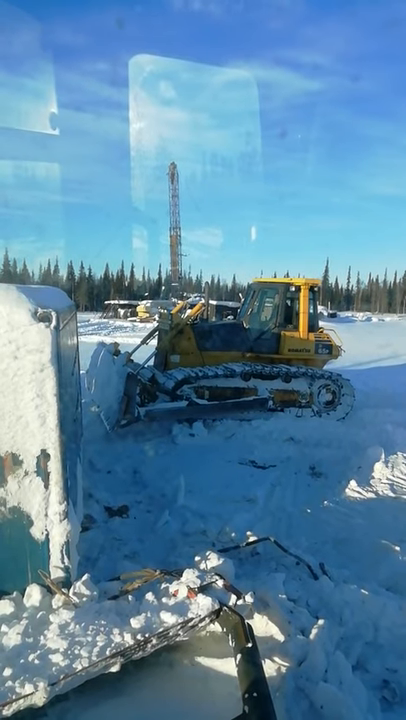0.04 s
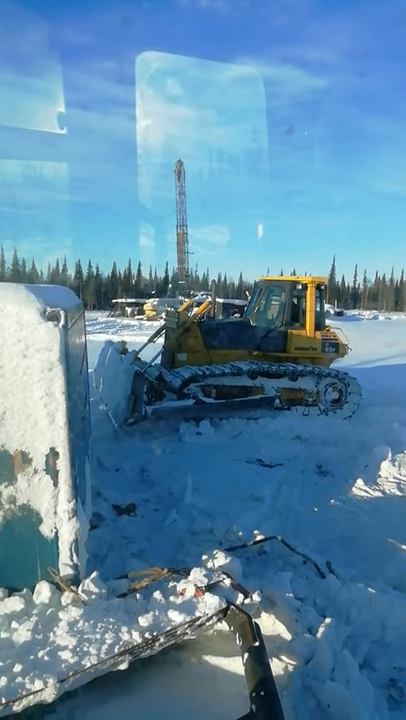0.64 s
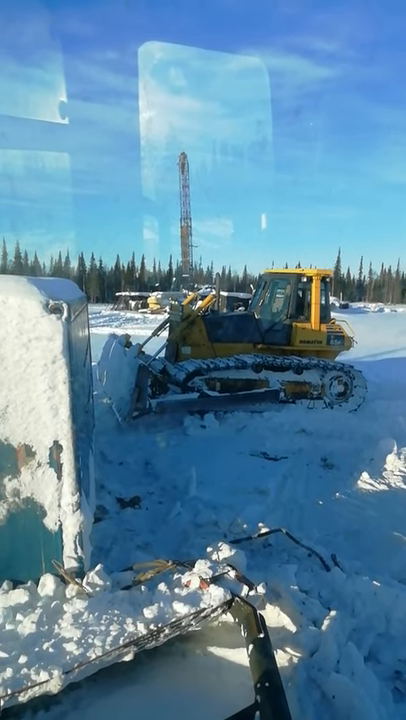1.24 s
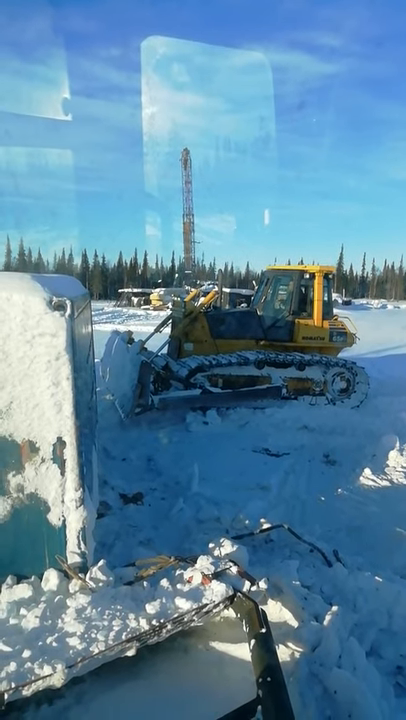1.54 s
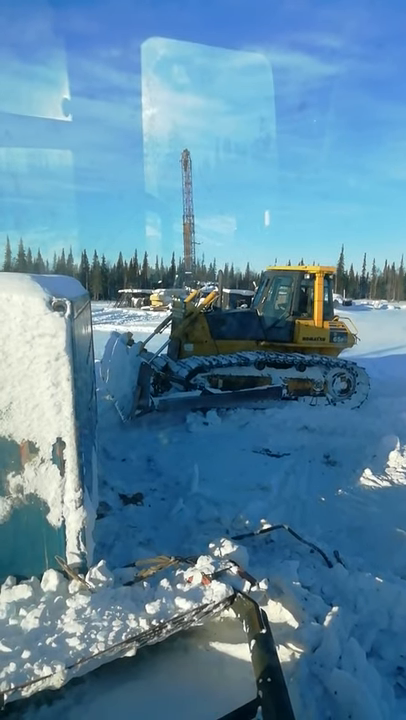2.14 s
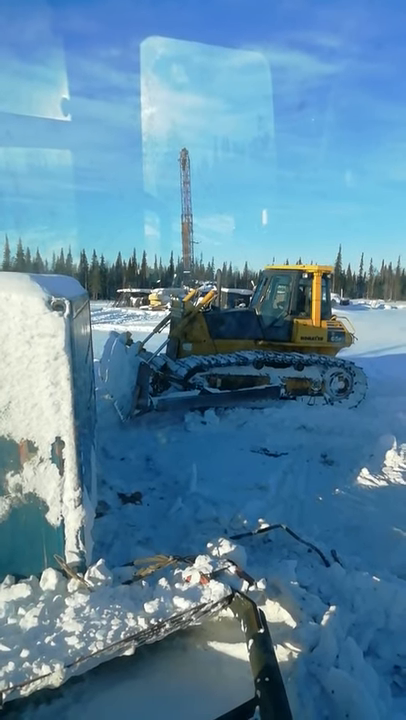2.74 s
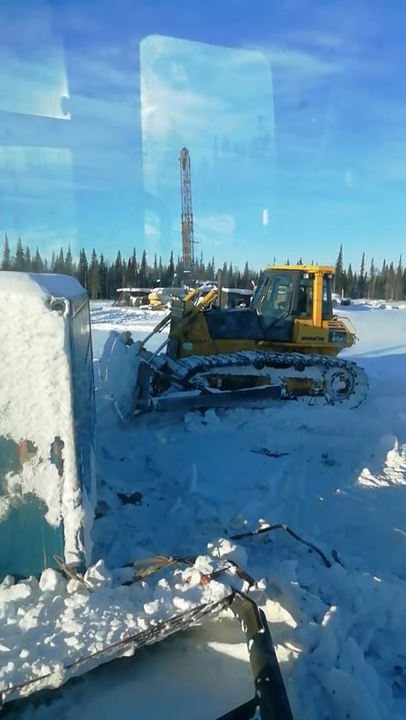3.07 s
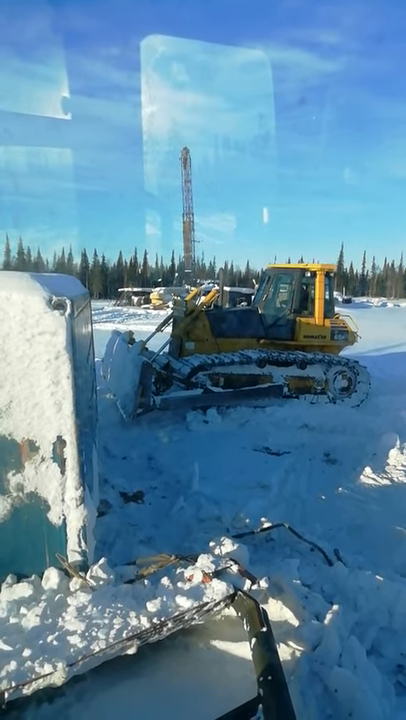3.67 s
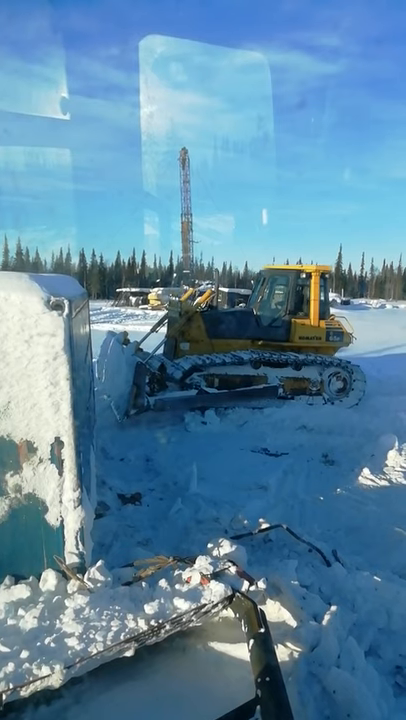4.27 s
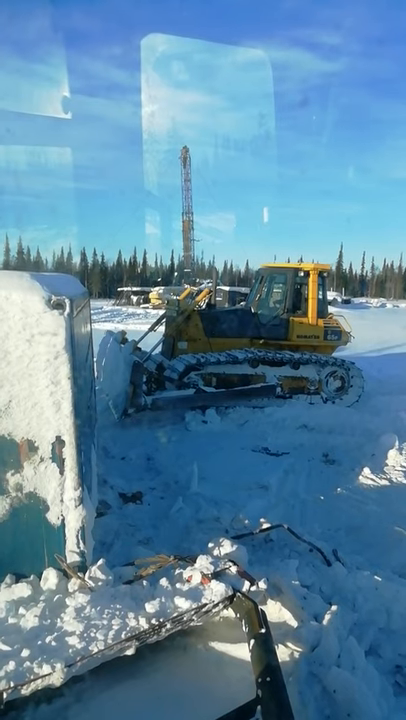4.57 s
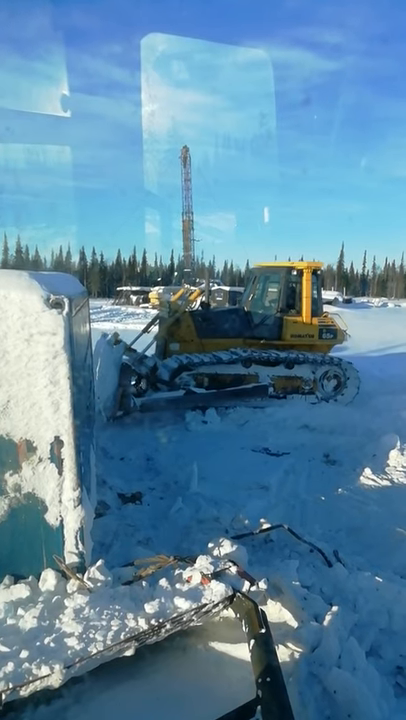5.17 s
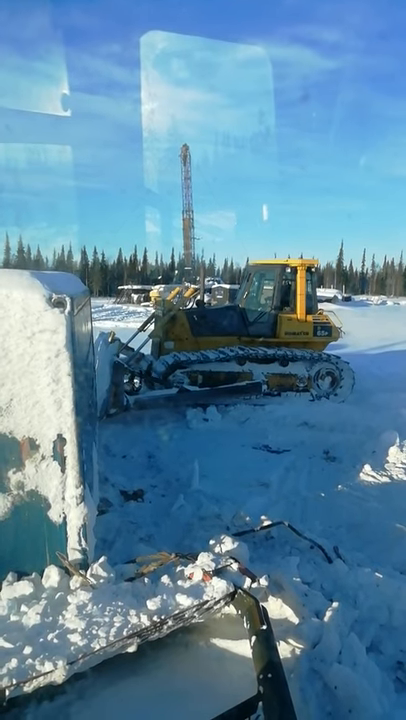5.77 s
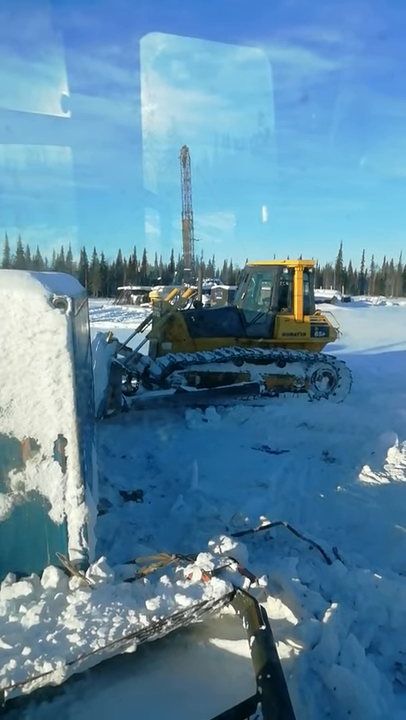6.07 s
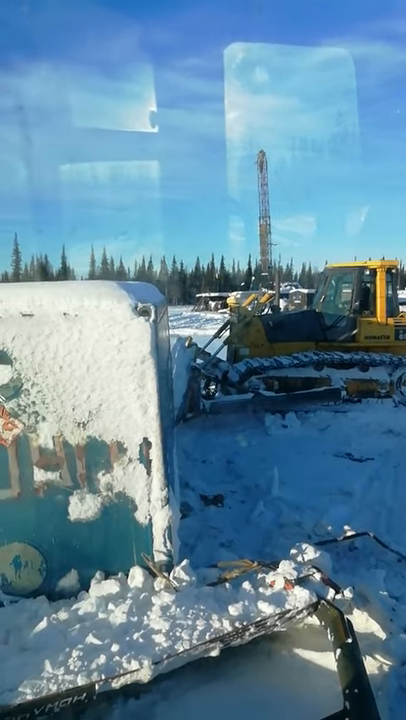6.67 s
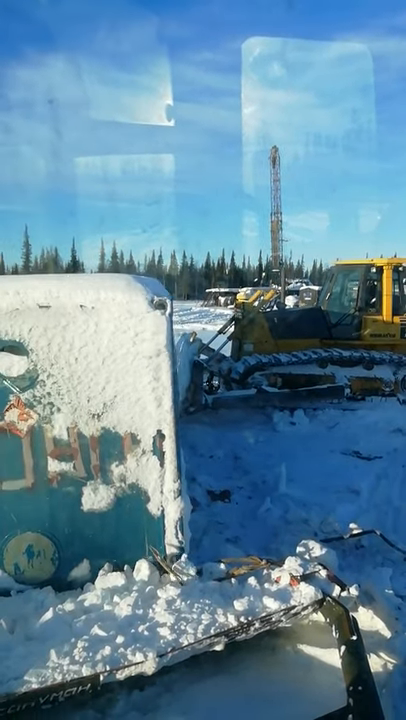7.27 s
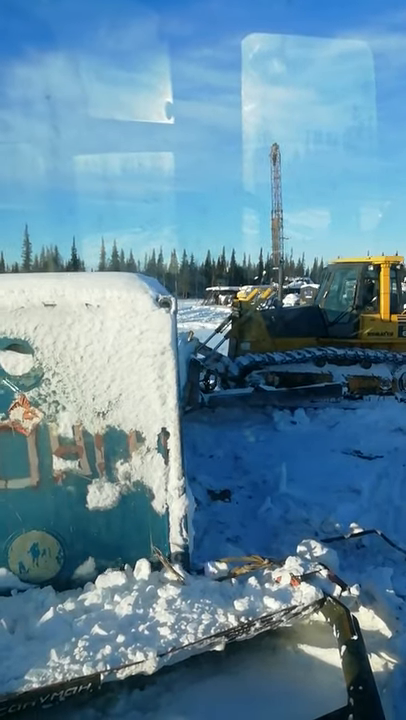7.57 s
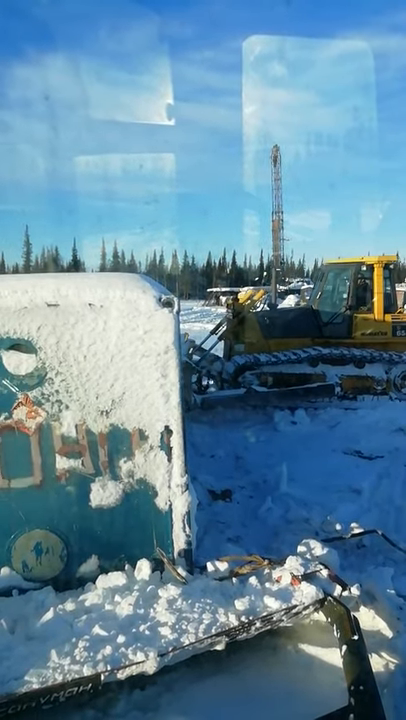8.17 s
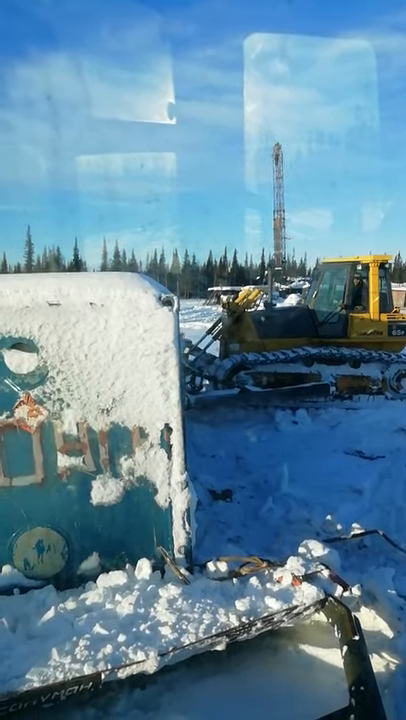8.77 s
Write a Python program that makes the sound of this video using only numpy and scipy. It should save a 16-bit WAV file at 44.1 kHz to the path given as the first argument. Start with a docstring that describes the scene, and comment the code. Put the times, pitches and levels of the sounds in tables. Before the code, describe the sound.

A diesel engine idles steadily with a deep booming hum, fan drone and gear whine, heard from inside a crawler's cab.

```python
"""A six-cylinder diesel idles steadily, heard from inside the cab of a crawler machine standing in snow.
From the start its firing booms over combustion rumble, block noise, clatter and injector ticks; the fan
drones, a gear whines, pulleys sing faintly and a second engine outside beats against the hum.
At 6.3 s the microphone turns through the cab's standing waves: the whine swells and moves right,
thin metal rings and the ticks come forward. The idle runs on in this new colour to the end."""
import sys
import numpy as np
from scipy.fft import rfft, irfft, next_fast_len
from scipy.io import wavfile
from scipy.ndimage import map_coordinates

SR = 44100
rng = np.random.default_rng(int(sys.argv[2]) if len(sys.argv) > 2 else 0)


def generate_wav(signal):
    """Clip the signal to [-1, 1] and save it as 16-bit WAV at the path in sys.argv[1]."""
    frames = np.transpose(np.atleast_2d(signal))
    scaled = np.clip(frames, -1, 1) * 32767
    pcm = np.round(scaled).astype(np.int16)
    wavfile.write(sys.argv[1], SR, pcm)


N = 393372
T = np.arange(N) / SR
FIRING_HZ, FIRING_START = 41.137, .4335  # idle rate; share of a firing interval gone at the start
TURN_START_S, TURN_S = 6.3, 0.59  # the microphone's one turn


def amp(db):
    """Decibels to gain."""
    return 10 ** (np.asarray(db) / 20)


def along(table, hz):
    """Each column of a spectrum table at hz, on a log frequency axis."""
    freq_hz, *columns = np.transpose(table)
    return np.array([np.interp(np.log(hz + 1), np.log(freq_hz + 1), column) for column in columns])


def wobble(rate):
    """A smooth random curve, rate knots a second."""
    return map_coordinates(rng.standard_normal(int(N * rate / SR) + 4), [T * rate], mode="nearest")


def swing(period_s, crest_s):
    """A slow, even swing between -1 and 1."""
    return np.cos(2 * np.pi * (T - crest_s) / period_s)


def filtered(x, response):
    """x through a frequency response, its ends mirrored smoothly."""
    x = np.pad(x, ((0, 0), (SR, SR)), mode="reflect", reflect_type="odd")
    size = next_fast_len(x.shape[1])
    return irfft(rfft(x, size) * response(np.fft.rfftfreq(size, 1 / SR)), size)[:, SR:SR + N]


def coloured(white, spectrum):
    """White noise of rms 1 shaped to a spectrum in dB per Hz."""
    gain = amp(along(spectrum, np.fft.rfftfreq(N, 1 / SR)))
    return irfft(rfft(white) * gain, N) * np.sqrt(SR / 2)


def tone(cycles, left_db, right_db, lead_rad, waver_db, drift_rad):
    """A wavering tone that standing waves bring to each side with its own level and phase."""
    angle = 2 * np.pi * (cycles + rng.random()) + drift_rad * wobble(5)
    left = amp(left_db) * np.cos(angle + lead_rad / 2)
    right = amp(right_db) * np.cos(angle - lead_rad / 2)
    return np.sqrt(2) * amp(waver_db * wobble(2.4)) * np.array([left, right])


# Accent of each cylinder's knock, in firing order: level_db
CYLINDER_ACCENTS = [-1, -0.16, -0.17, 0.92, 0.89, 0.31]
def bursts(firing, delay, decay, steady, scatter_db):
    """Envelope of rms 1: one burst per firing over a steady bed; delay and decay in firing intervals."""
    stroke, age = np.divmod(firing - delay + len(CYLINDER_ACCENTS), 1)
    stroke = stroke.astype(int)
    scatter = scatter_db * rng.standard_normal(stroke.max() + 1)[stroke]
    accent = amp(np.take(CYLINDER_ACCENTS, stroke, mode="wrap") + scatter)
    envelope = np.hypot(steady, accent * age / decay * np.exp(1 - age / decay))
    return envelope / np.sqrt(np.mean(envelope ** 2))


# How much later the engine reaches the left side: freq_hz, lag_s
LEFT_LAG = [(40, .00024), (100, .00017), (200, .00004), (350, 0.00057), (520, 0.00096), (1000, 0.00071),
            (3000, .0006)]
def lagged(x):
    """Sound reaches the right side just ahead of the left."""
    return filtered(np.atleast_2d(x),
                    lambda hz: np.exp(1j * np.pi * hz * along(LEFT_LAG, hz) * [[-1], [1]]))


# Change of colour once the microphone has turned: freq_hz, gain_db
TURNED_EQ = [(500, -0.5), (780, 1), (1250, -.5), (1700, -3.5), (2250, 1), (2750, 0), (3400, -0.5),
             (4200, -1), (5800, -1.5), (7500, -0.5)]
def cab(x, turn, ripple_db=2.0, spacing_hz=55):
    """Glass and steel walls ripple the treble differently on each side; the turn shifts the colour."""
    def ripple(hz):
        knots = rng.standard_normal((2, N // 100))
        field = np.array([map_coordinates(side, [hz / spacing_hz], mode="nearest") for side in knots])
        return amp(ripple_db * field * hz / (hz + 1500))
    x = filtered(x, ripple)
    turned = filtered(x, lambda hz: amp(along(TURNED_EQ, hz)))
    return (1 - turn) * x + turn * turned


def second_engine(firing_hz=74.9):
    """The firing hum of a diesel outside, beating against the octave of the near one."""
    level_db = -32.5 + 0.91 * wobble(2.2)
    return np.sqrt(2) * amp(level_db) * np.cos(2 * np.pi * firing_hz * T + 0.051 * wobble(8.2))


# Faint tones of belt-driven parts: pitch_hz, left_db, right_db
PULLEY_TONES = [(236.7, -51, -56.5), (301.7, -58.5, -58.5), (401.5, -58, -55), (815, -54.5, -66.5),
                (812, -56.5, -63.5), (915, -57.5, -66), (969, -60.5, -55.5), (1038, -64.5, -63),
                (1153.5, -62.5, -62)]
def pulleys(firing):
    """Pulleys sing faintly, following the engine's speed."""
    engine_s = firing / FIRING_HZ
    return sum(tone(pitch_hz * engine_s, left_db, right_db, lead_rad=0.75, waver_db=0.9, drift_rad=0.33)
               for pitch_hz, left_db, right_db in PULLEY_TONES)


# Injector sizzle before its lift: freq_hz, left_db_per_hz, right_db_per_hz
TICK_SPECTRUM = [(3000, -125, -125), (8900, -120, -122), (12300, -108, -116), (14200, -106, -116),
                 (14750, -98, -111), (15200, -104, -118), (15700, -111, -130)]
def injectors(firing, turn):
    """A fine tick between ignitions over a thin hiss, clearer once the microphone has turned."""
    ticks = bursts(firing, delay=0.56, decay=.05, steady=0.3, scatter_db=1.4)
    lift_db = 1.5 + 3.4 * turn
    return coloured(rng.standard_normal((2, N)) * ticks, TICK_SPECTRUM) * amp(lift_db)


# Combustion rasp, then thin metal ring: freq_hz, left_db_per_hz, right_db_per_hz
RASP_SPECTRUM = [(900, -100, -100), (2200, -89.5, -92), (3350, -91.5, -90.5), (4280, -99.5, -98),
                 (4930, -94, -95), (5750, -100, -97.5), (6960, -106, -96), (8030, -111, -100),
                 (8900, -109, -108), (9900, -105, -106), (11200, -108, -111), (15500, -110, -114)]
RING_SPECTRUM = [(2800, -120, -120), (3480, -90.5, -90), (4230, -115, -115), (4800, -92, -94),
                 (5050, -97.5, -92), (5600, -120, -120)]
def clatter(firing, turn):
    """Each ignition gives a short rasp and sets thin metal ringing; the ring fades in with the turn."""
    knocks = bursts(firing, delay=-.12, decay=.14, steady=0.97, scatter_db=1.8)
    ringing = bursts(firing, delay=-.12, decay=.14, steady=0.37, scatter_db=2.0)
    rasp = coloured(rng.standard_normal((2, N)) * knocks, RASP_SPECTRUM)
    ring = coloured(rng.standard_normal((2, N)) * ringing, RING_SPECTRUM)
    return rasp + turn * ring


# Placement of the whine before and after the turn: left_db, right_db, left_lead_rad
WHINE_PLACEMENT = [(-42.5, -44.5, -1.1), (-57, -40, -.1)]
def timing_gear(firing, turn, teeth=62):
    """Meshing teeth whine; the whine sways between the sides, then swells and moves right with the turn."""
    mesh = firing * teeth / 3  # three firings a revolution
    before, after = WHINE_PLACEMENT
    left_db, right_db, lead_rad = np.outer(before, 1 - turn) + np.outer(after, turn)
    sway_db = swing(period_s=2.0, crest_s=0) * (1 - turn)
    whine = tone(mesh, left_db + sway_db, right_db - sway_db, lead_rad, waver_db=0.4, drift_rad=0.06)
    # the turn ends on a crest of the whine's standing wave
    crest_db = 2.5 * np.exp(-((T - TURN_START_S - TURN_S) / .2) ** 2)
    return amp(crest_db) * whine


# Fan drone: blade_harmonic, left_db, right_db, left_lead_rad, turned_gain_db
FAN_TONES = [(1, -30.5, -29.5, 0.11, 0), (2, -32.5, -32, 1.28, -1.2), (3, -53, -55.5, 2.74, -2.5),
             (4, -43.5, -45.5, 3, 0), (8, -67.5, -57, 2.2, -1.5), (10, -65, -73.5, 3.5, -3),
             (12, -77.5, -70, 2.5, -2.5), (14, -73.5, -68, 2.5, -3.5), (16, -64, -64.5, 1.1, -5.5),
             (20, -71, -68, 2.3, -5), (21, -78.5, -78, 2.3, -2), (22, -79, -80, 5.5, -2.5),
             (24, -84.5, -80, 2.5, -1)]
def fan(firing, turn, blades_per_firing=4.68025):
    """Blade tones, each with its own standing wave: the lowest beats slowly, the high ones waver more."""
    drone = np.zeros((2, N))
    beat_db = 2 * swing(period_s=1.899, crest_s=1.378)
    for harmonic, left_db, right_db, lead_rad, turned_gain_db in FAN_TONES:
        height = harmonic / len(FAN_TONES)
        partial = tone(harmonic * blades_per_firing * firing, left_db, right_db, lead_rad,
                       waver_db=0.36 + .6 * height, drift_rad=0.3 * height)
        drone += partial * amp(turned_gain_db * turn + beat_db * (harmonic == 1))
    return drone


# Engine noise through the cab walls: freq_hz, left_db_per_hz, right_db_per_hz
BLOCK_SPECTRUM = [(199, -86.5, -89), (356, -60.5, -64), (480, -67.5, -71.5), (670, -66, -68.5),
                  (797, -63, -65.5), (1068, -74.5, -76), (1154, -69.5, -67), (1416, -75, -71.5),
                  (1990, -81, -81), (2170, -79.5, -84), (2310, -86, -86), (3240, -91, -93),
                  (4200, -101, -101), (9000, -125, -125)]
# How much of it loops with the engine cycle: freq_hz, power_share
LOOP_SHARE = [(200, 0.56), (900, .5), (1500, 0.23), (3000, 0.061)]
# How alike its two sides are: freq_hz, coherence
STEREO_LIKENESS = [(250, 0.53), (560, 0.83), (1200, 0.44), (1900, 0.44), (3100, 0.34), (5000, .1)]
def engine_block(firing):
    """Noise of the block: part repeats with every engine cycle, part is new; it swells at each firing."""
    cylinders = len(CYLINDER_ACCENTS)
    cycle_samples = round(cylinders * N / (firing[-1] - firing[0]))
    position = firing / cylinders % 1 * cycle_samples
    looped = np.array([map_coordinates(cycle, [position], mode="grid-wrap")
                       for cycle in rng.standard_normal((2, cycle_samples))])
    fresh = rng.standard_normal((2, N))
    hz = np.fft.rfftfreq(N, 1 / SR)
    share = np.clip(along(LOOP_SHARE, hz), 0, 1)
    mid, side = np.sqrt(share) * rfft(looped) + np.sqrt(1 - share) * rfft(fresh)
    width_rad = np.arccos(np.clip(along(STEREO_LIKENESS, hz)[0], -1, 1)) / 2
    mid, side = mid * np.cos(width_rad), side * np.sin(width_rad)
    stereo = irfft(np.array([mid + side, mid - side]), N)
    swell = bursts(firing, delay=-0.13, decay=0.18, steady=1.2, scatter_db=2.0)
    flutter_db = 0.37 * wobble(3) + 0.57 * wobble(12)
    return coloured(stereo * swell, BLOCK_SPECTRUM) * amp(flutter_db)


# Low bed of combustion rumble: freq_hz, level_db_per_hz
RUMBLE_SPECTRUM = [(8, -68.5), (22, -53.5), (30, -58.5), (50, -52.5), (90, -49.5), (125, -56.5),
                   (150, -61.5), (200, -58.5), (240, -61), (285, -70.5), (375, -66.5), (440, -80),
                   (600, -95), (1200, -130)]
def rumble():
    """Low turbulence of exhaust and panels, in mono."""
    return coloured(rng.standard_normal((1, N)), RUMBLE_SPECTRUM)


# Cab boom, as harmonics of the two-revolution engine cycle: harmonic, level_db
BOOM_HARMONICS = [(3, -45.5), (5, -45), (6, -14.5), (7, -42), (8, -39.5), (10, -40.5), (12, -25.5),
                  (14, -45), (16, -36), (18, -30), (22, -46), (24, -44.5), (25, -41.5), (26, -40),
                  (30, -47.5), (32, -47), (34, -47), (44, -57.5), (45, -58), (50, -58.5), (51, -52.5),
                  (54, -48), (69, -53.5)]
def firing_boom(firing, waver_db=.5):
    """Firing makes a steady pressure pulse; uneven cylinders add wavering harmonics around it."""
    boom = np.zeros(N)
    for harmonic, level_db in BOOM_HARMONICS:
        angle = 2 * np.pi * harmonic * firing / len(CYLINDER_ACCENTS)
        if harmonic in (6, 12):  # the firing rate and its octave
            boom += amp(level_db) * np.cos(angle)
        else:
            boom += amp(level_db + waver_db * wobble(1.7)) * np.cos(angle + 2 * np.pi * rng.random())
    return np.sqrt(2) * boom


def scene():
    """One count of firings clocks the near engine; one turn of the microphone shifts the colours."""
    hunt = 0.0053 * wobble(2)  # the governor lets the engine run slightly ahead and behind
    firing = FIRING_START + FIRING_HZ * T + hunt
    turn = np.clip((T - TURN_START_S) / TURN_S, 0, 1)
    hum = lagged(firing_boom(firing) + second_engine() + rumble())
    noise = lagged(engine_block(firing)) + clatter(firing, turn) + injectors(firing, turn)
    return hum + cab(noise, turn) + fan(firing, turn) + timing_gear(firing, turn) + pulleys(firing)


def record(dry):
    """A brick-wall low-pass at 15760 Hz."""
    return filtered(dry, lambda hz: hz < 15760)


dry = scene()
out = record(dry)
generate_wav(out)
```